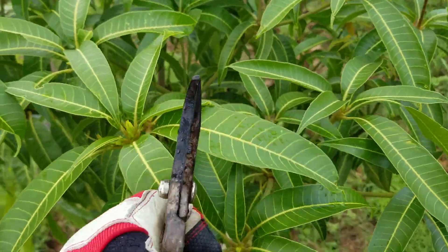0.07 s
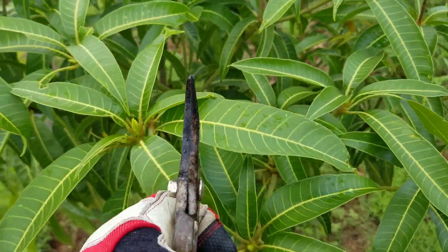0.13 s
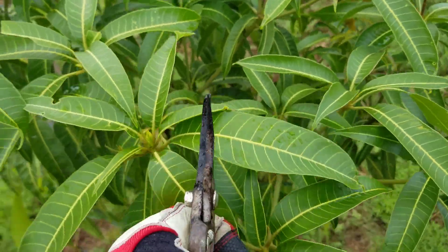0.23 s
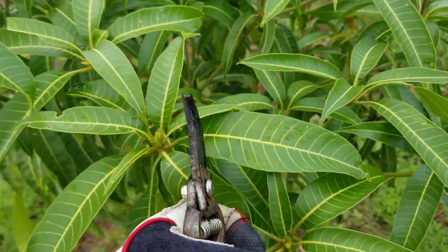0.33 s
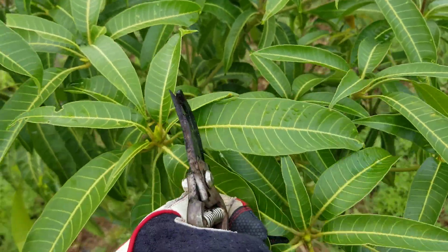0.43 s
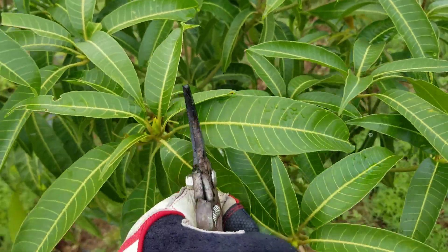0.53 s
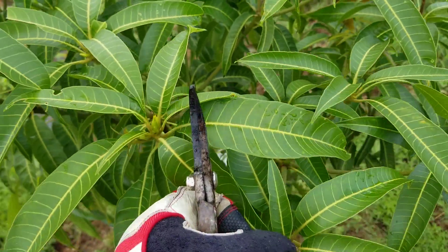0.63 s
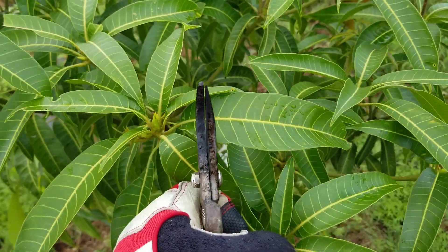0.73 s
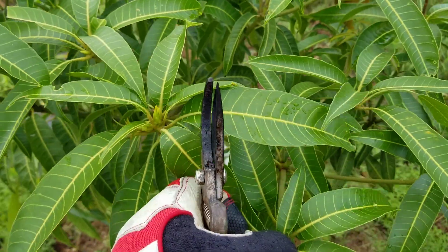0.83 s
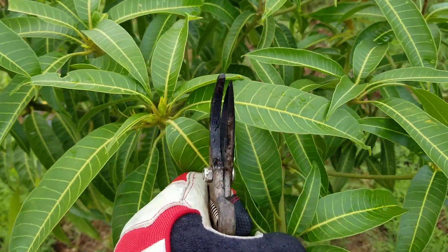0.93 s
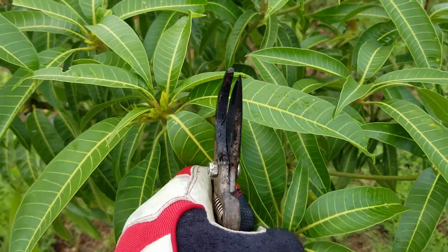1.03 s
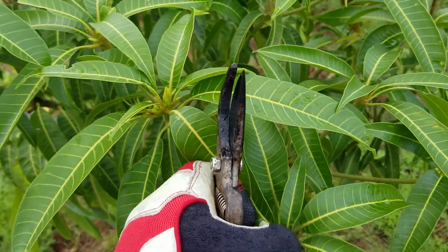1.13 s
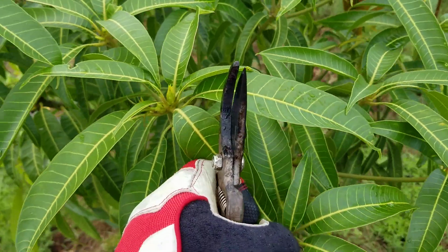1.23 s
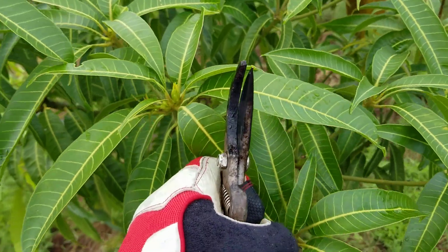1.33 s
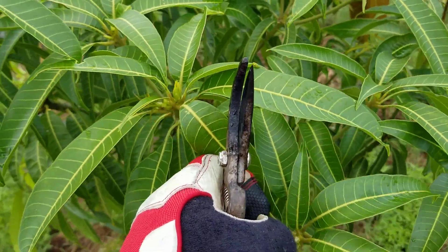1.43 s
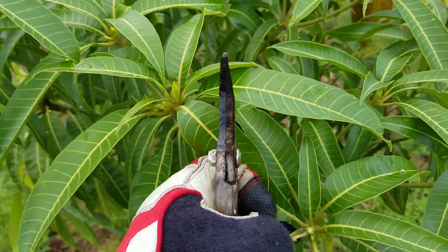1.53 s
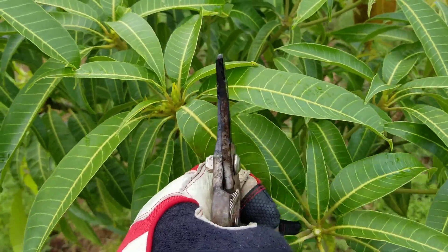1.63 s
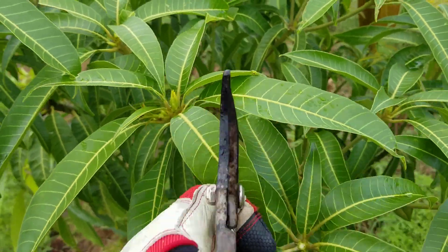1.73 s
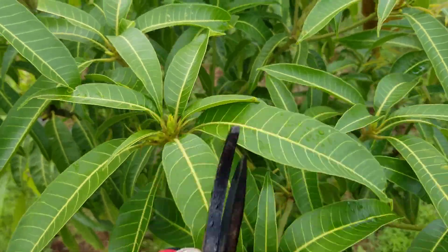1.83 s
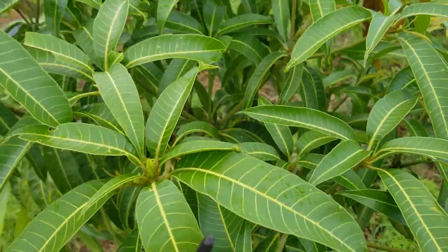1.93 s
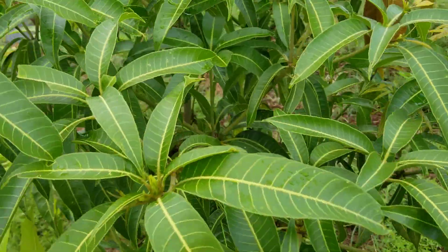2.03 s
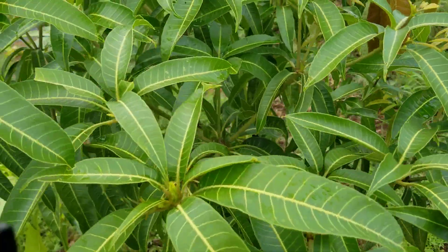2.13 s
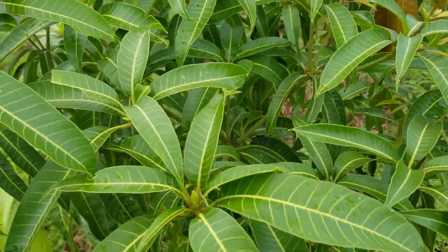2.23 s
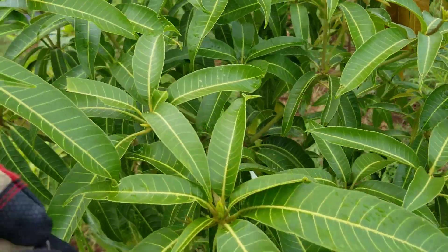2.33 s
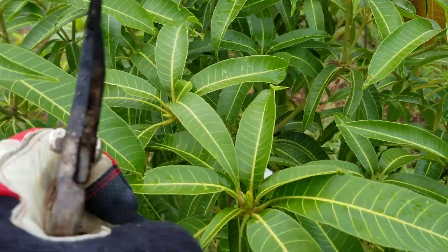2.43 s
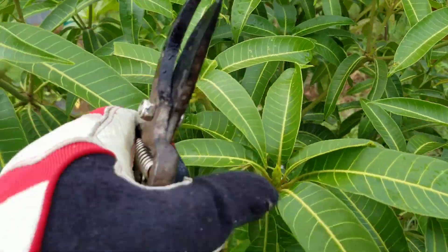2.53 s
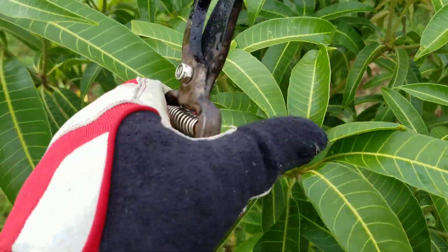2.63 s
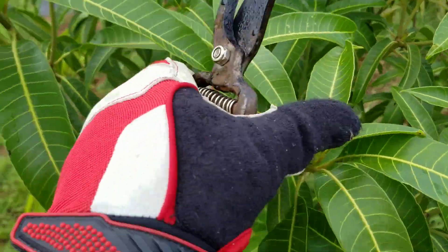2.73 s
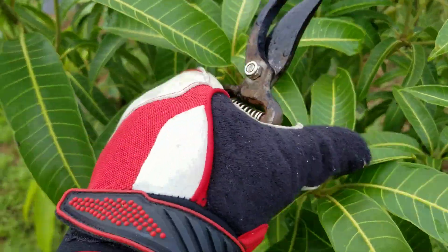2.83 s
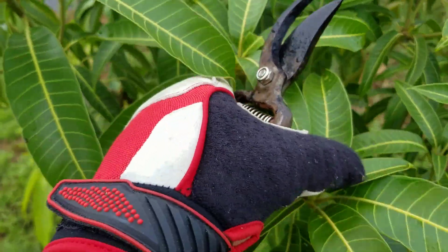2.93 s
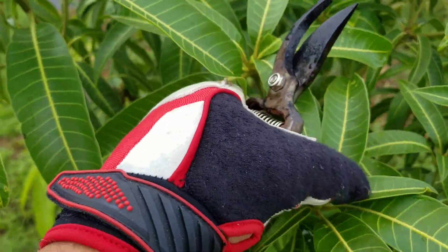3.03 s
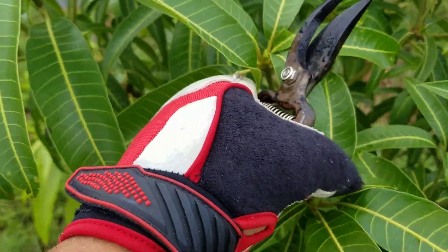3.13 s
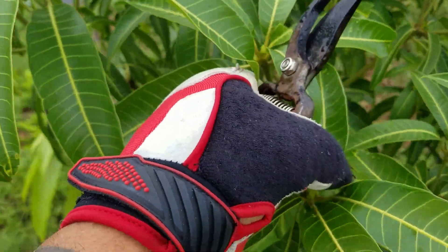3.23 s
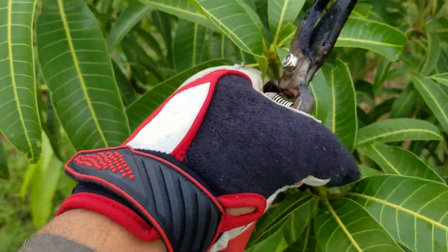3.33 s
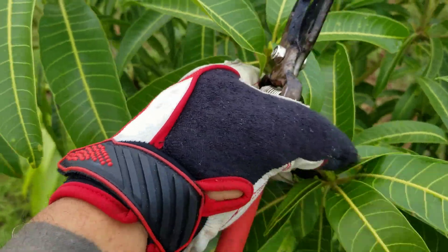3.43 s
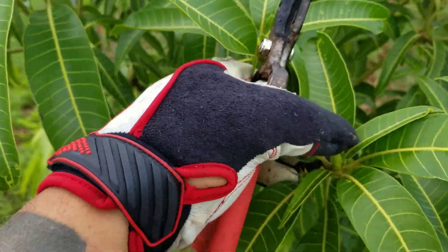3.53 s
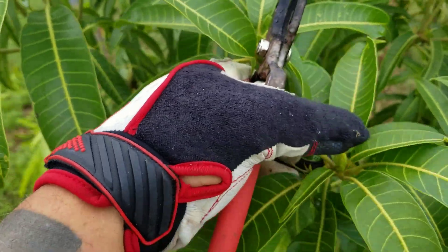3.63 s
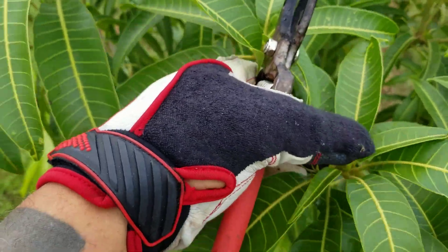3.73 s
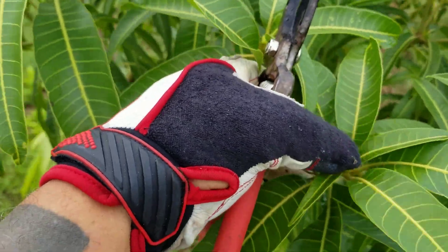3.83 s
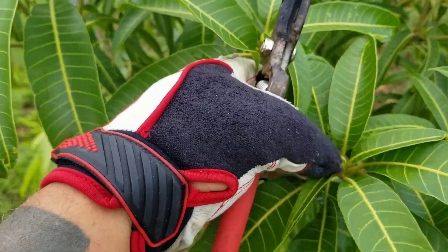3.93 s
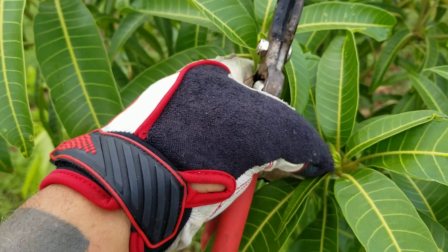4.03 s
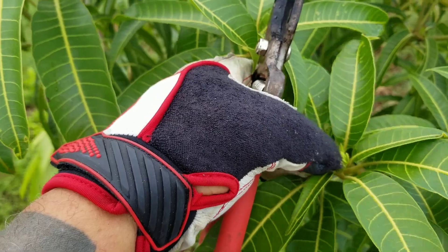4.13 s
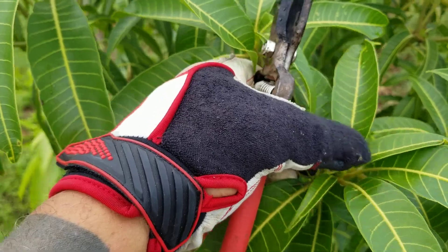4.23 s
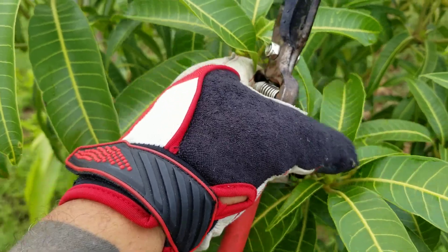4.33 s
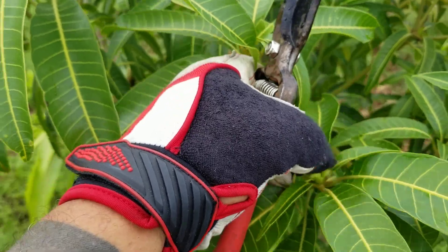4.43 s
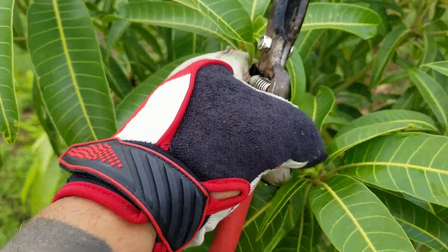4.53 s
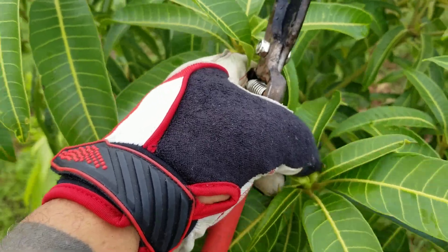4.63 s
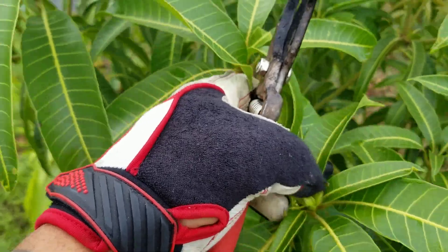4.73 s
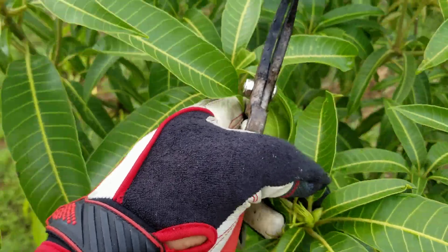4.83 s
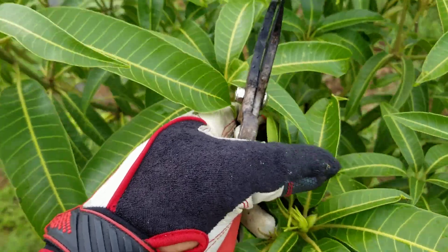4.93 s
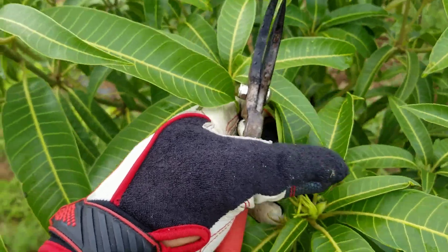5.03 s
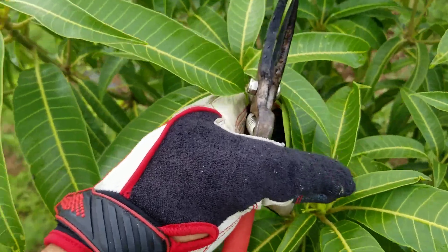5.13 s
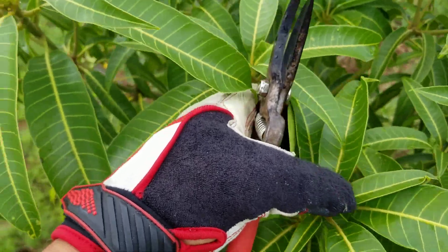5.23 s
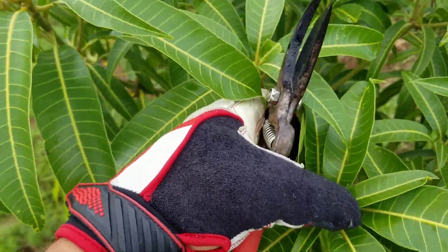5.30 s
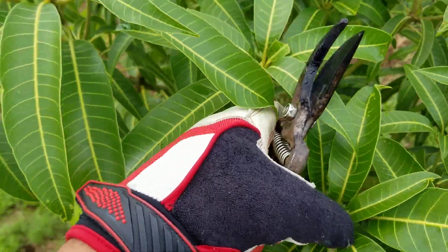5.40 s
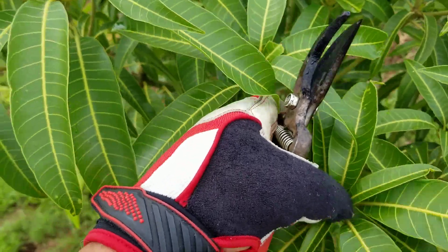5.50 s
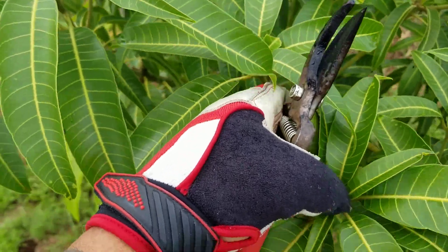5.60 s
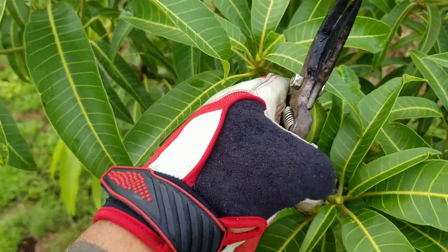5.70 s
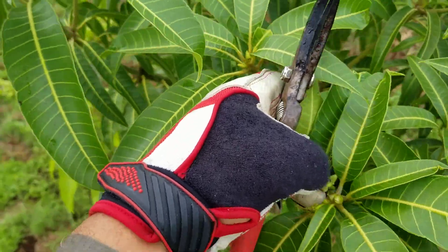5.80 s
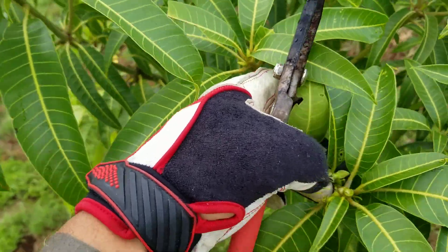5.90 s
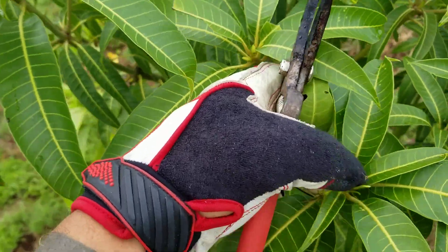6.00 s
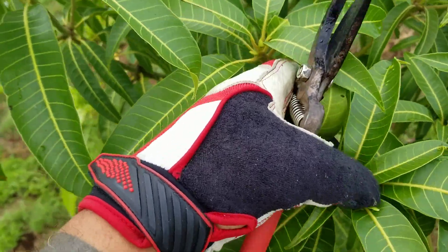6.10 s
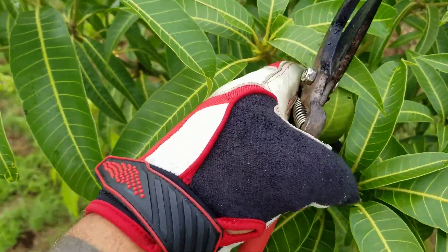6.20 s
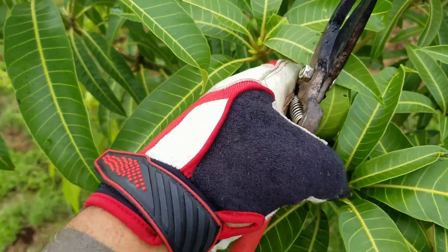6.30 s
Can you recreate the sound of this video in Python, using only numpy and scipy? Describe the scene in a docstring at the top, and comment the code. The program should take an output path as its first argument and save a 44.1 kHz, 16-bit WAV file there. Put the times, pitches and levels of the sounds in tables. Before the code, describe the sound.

Pruning shears click and snip among rustling leaves outdoors, with light wind on the microphone and roosters crowing faintly in the distance.

```python
"""A gloved hand works pruning shears among stiff leaves, close to a phone. From the start: snaps, knocks,
rustle, wind buffeting both microphone ports, a far hiss of trees and insects. Near 1 s a hen clucks
and a small bird chirps. Two distant roosters crow between 1.6 and 4.2 s; from 3.2 s a bird whoops.
The pivot squeaks at 4.56 s and a third rooster follows. The hardest snaps come at 5.6-5.7 s."""
import sys
import numpy as np
from scipy import signal
from scipy.fft import rfft, irfft, next_fast_len
from scipy.io import wavfile
from scipy.ndimage import uniform_filter1d, map_coordinates

SR = 44100
rng = np.random.default_rng(int(sys.argv[2]) if len(sys.argv) > 2 else 0)


def master(y):
    """Save y as 16-bit WAV."""
    cut = np.clip(np.atleast_2d(y).T, -1, 1)
    pcm = np.round(cut * 32767)  # scale
    wavfile.write(sys.argv[1], SR, pcm.astype(np.int16))


N = 280431

# Each row: start in seconds, level in dB, relative treble in dB, swell in ms.
SHEAR_SNAPS = [(0.064, -36, -4, 5.3), (.343, -30.5, 3, 1.3), (0.5382, -33, 19.5, 0.37),
               (0.895, -35.5, 7.5, 0.58), (1.209, -24.5, 0.5, 0.57), (1.2928, -38.5, 11, 0.41),
               (1.4751, -26, 1, 1.25), (1.8046, -35.5, 2, 0.93), (3.0755, -19, -9, 1.26),
               (3.091, -22.5, -9, 0.55), (3.299, -28, -2, 0.77), (3.472, -25.5, -1, 3.5),
               (3.6371, -28, -10, 0.95), (3.806, -25.5, -1.5, 4.7), (3.91, -39, 5, 6.1),
               (4.0026, -32.5, 2, 1.13), (4.043, -44, 12, 1.34), (4.123, -37, -3, 0.71),
               (4.4132, -25.5, 15, 0.24), (4.5017, -19, -2.5, 0.45), (4.558, -23.5, -6, .8),
               (4.595, -37, -4, 0.37), (4.6141, -25.5, 1, 0.59), (4.9126, -22.5, -0.5, 3.04),
               (5.512, -25, 6, 0.92), (5.5786, -6.5, 3, 0.39), (5.632, -24, 1, 1.26), (5.6642, -5, -4, 0.4),
               (5.678, -22, 0.5, 5.8), (5.7369, -5, 10.5, 0.32), (5.7595, -25, 0, 1.5),
               (6.18, -30.5, -5, 0.89), (6.346, -32, -2, 1.2)]
# Hand position. Each row: time in seconds, pan (left minus right) in dB.
HAND_PAN = [(0, -1.5), (5.58, -3), (5.7, -5.5)]
# Constant stirring of leaves. Each row: time in seconds, level in dB.
LEAF_STIR = [(0, -64), (.8, -65), (1.5, -62.5), (2.2, -67.5), (2.7, -56), (4.2, -58), (5.05, -62.5),
             (5.6, -54.5), (6.36, -63)]


def snaps():
    """A hard contact and a short crackle ring the shears' body and blade tips."""
    # Each row: mode frequency in Hz, width in Hz, gain in dB. The hand damps the body.
    body_modes = [(1040, 870, -6), (2480, 470, -0.5), (3100, 335, -1.5), (4430, 1640, -6)]
    tip_modes = [(7500, 920, 1.5), (11800, 2300, -0.5)]
    energy_db, tip_db = 7.5, -7.5
    out = np.zeros((2, N + SR))
    t_ms = 1000 * np.arange(1024) / SR
    hz = np.fft.rfftfreq(2048, 1 / SR)
    highpass = (1j * hz / (5000 + 1j * hz)) ** 2
    colour = np.array([resonances(body_modes, hz), resonances(tip_modes, hz) * highpass])[:, None]
    pan_db = curves(HAND_PAN)[0]
    for start_s, db, treble_db, swell_ms in SHEAR_SNAPS:
        at = round(start_s * SR)
        swell_ms = np.clip(swell_ms, .15, 5)
        age = t_ms / swell_ms * np.array([[[1]], [[1.4]]])  # axes: body/tips, channel, time
        envelope = age * np.exp(-age) + .2 * np.exp(-age / 5)
        noise = rng.standard_normal((2, 3, len(t_ms)))
        common = np.array([[[.85]], [[.3]]]) * noise[:, :1]
        crack = envelope * (common + 0.86 * noise[:, 1:])
        crack /= np.linalg.norm(crack, axis=2, keepdims=True)
        contact = round(swell_ms * SR / 1000)
        crack[:, [0, 1], [contact + 2, contact]] += 2.2 * np.exp(-swell_ms / .7)  # right port first
        crack = irfft(rfft(crack, 2048) * colour)[..., :1536]
        crack /= np.linalg.norm(crack, axis=2, keepdims=True)
        # The phone shades the tips more than the body.
        shade = amp(np.array([[.5], [-.5]]) * [[[1.1]], [[1.6]]] * pan_db[at])
        body, tips = crack * shade * np.sqrt(swell_ms)  # longer burst, more energy
        out[:, at:at + 1536] += amp(db + energy_db) * (body + amp(treble_db + tip_db) * tips)
    return out[:, :N]


def knocks():
    """Handle and stem bump softly: a few cycles of one mode, roughened by the grip."""
    # Each row: start in seconds, peak in dB, frequency in Hz.
    bumps = [(0.436, -29, 1040), (1.513, -31.5, 1170), (2.733, -29.5, 654), (2.81, -30.5, 1080),
             (2.817, -33, 1260), (2.826, -33, 1230), (2.838, -34.5, 1340), (2.858, -26.5, 1150),
             (4.132, -31.5, 336)]
    out, t = np.zeros(N + SR), np.arange(2048) / SR
    for start_s, db, hz in bumps:
        grip = 1 + 0.65 * unit(uniform_filter1d(rng.standard_normal(len(t)), size=16))
        envelope = amp(-60 * t * hz / 12) * (1 - np.exp(-t / 0.002))
        bump = envelope * grip * np.sin(2 * np.pi * hz * t)
        out[round(start_s * SR):][:len(t)] += amp(db) * bump / np.abs(bump).max()
    return placed(out[:N], pan_db=-2.5)


def squeak():
    """The pivot slips and catches: an uneven rising chirp, bright at first."""
    # Each row: time in seconds, slip rate in Hz, level in dB.
    slips = [(4.5582, 1450, -52), (4.5595, 1420, -33), (4.5625, 1730, -33), (4.563, 1520, -33),
             (4.571, 1815, -35.5), (4.577, 1740, -53)]
    hz, db = curves(slips)
    t = np.arange(N) / SR - slips[0][0]
    gate = (t > 0) * (t < slips[-1][0] - slips[0][0])
    phase = 2 * np.pi * np.cumsum(hz) / SR + .25 * wobble(900)
    harmonics = [amp(-14), amp(0.5), amp(6.5) * np.exp(-np.abs(t) / 0.0023), amp(-19.5)]
    wave = sum(gain * np.sin(k * phase) for k, gain in enumerate(harmonics, 1))
    grain = 1 + .2 * wobble(700)
    return placed(gate * np.sqrt(2) * amp(db) * grain * wave, pan_db=-7)


def rustle():
    """Leaves rub and the glove scuffs: patchy noise, lightly broken into puffs."""
    leaf_gain, glove_gain = handling()
    rub = (1.75 + crackle(110, spread_db=3.5, life_s=0.00092)) * stereo_noise(0.07)
    scuff = (2.0 + crackle(150, spread_db=9.0, life_s=0.0022)) * stereo_noise(0.89)
    # Each row: frequency in Hz, relative density in dB.
    leaf_spectrum = [(500, -23.5), (1000, 4), (1550, -3), (2200, 2), (3400, -4.5), (4400, -2.5),
                     (6000, -10.5), (10000, -13), (15850, -15)]
    glove_spectrum = [(120, -3), (400, -0.5), (850, -1), (1500, -6.5), (3000, -16), (6000, -42)]
    leaves = coloured(leaf_spectrum, patchy(rub, depth_db=3, bins=3, frames=12))
    glove = coloured(glove_spectrum, patchy(scuff, depth_db=3.5, bins=2, frames=6))
    side = amp(np.outer([.5, -.5], curves(HAND_PAN)[0]))
    return side * (leaf_gain * leaves + glove_gain * glove)


def handling():
    """Leaf and glove gains: the hand brushes through stirring leaves; each snap shakes them."""
    # Each row: centre in seconds, half length in seconds, leaf level in dB, glove level in dB.
    brushes = [(0.005, 0.059, -49.5, -55), (0.173, 0.021, -51.5, -80), (0.323, 0.085, -49.5, -55),
               (0.466, 0.095, -49, -59), (1.438, 0.03, -47, -88), (1.519, 0.053, -52.5, -61),
               (1.672, 0.049, -53, -64.5), (1.905, 0.038, -41.5, -48), (2.827, 0.029, -43.5, -49),
               (2.917, 0.13, -50, -55), (3.122, 0.053, -49, -56), (3.501, 0.088, -49, -61),
               (3.727, 0.018, -45, -63), (4.184, 0.072, -55, -51), (4.36, 0.031, -47, -50),
               (4.454, 0.13, -49.5, -55.5), (4.788, 0.16, -48, -57), (5.443, 0.21, -55, -62),
               (5.693, 0.071, -41, -48), (5.893, 0.057, -48, -72), (6.188, 0.057, -52, -63),
               (6.36, 0.014, -40, -48)]
    glove_db, shake_db, shake_s = -8.5, -26.5, 0.0068
    t = np.arange(N) / SR
    power = amp(curves(LEAF_STIR)[0] + [[0], [glove_db]]) ** 2
    for centre_s, half_s, *levels_db in brushes:
        power += amp(levels_db)[:, None] ** 2 / (1 + ((t - centre_s) / half_s) ** 2) ** 2.62
    for start_s, db, *_ in SHEAR_SNAPS:
        power[0] += amp(db + shake_db) ** 2 * (t > start_s) * np.exp(-2 * np.abs(t - start_s) / shake_s)
    return np.sqrt(power)


def ticks():
    """Leaf edges strike each other: sparse, tiny, bright clicks."""
    clicks = crackle(14, spread_db=4.5, life_s=0.00066) * stereo_noise(0.22)
    return amp(curves(LEAF_STIR)[0] - 12) * coloured([(2500, -30), (6000, 6), (16000, -6)], clicks)


def wind():
    """Breeze and puffs buffet the two ports: lumpy rumble, nearly unrelated left and right."""
    # Each row: time in seconds, level in dB, left minus right in dB.
    breeze = [(0, -48.5, 20), (.2, -65, -7), (.6, -47.5, 3.5), (.8, -64.5, -25), (1.2, -56, -19),
              (1.75, -55, -5), (2.1, -63, 6.5), (2.6, -57, 3), (3.2, -56.5, -11.5), (3.6, -51, 2.5),
              (4.5, -52.5, -4), (4.86, -65, -19), (5.05, -49.5, -1.5), (5.7, -55, 1.5), (6.36, -39, 15.5)]
    # Each row: start in seconds, length in seconds, top level in dB.
    puffs = [(0.345, 0.033, -40.5), (0.415, 0.069, -44.5), (0.491, 0.06, -36.5), (0.581, 0.057, -41),
             (1.495, 0.063, -38.5), (1.908, 0.029, -44), (2.343, 0.046, -47.5), (3.252, 0.2, -42.5),
             (3.778, 0.044, -43.5), (3.9, 0.077, -42.5), (4.928, 0.037, -42.5), (4.976, 0.11, -41),
             (5.176, 0.044, -40), (5.245, 0.013, -37.5), (5.304, 0.027, -39.5), (5.603, 0.14, -30),
             (5.937, 0.07, -42.5), (6.087, 0.084, -43), (6.207, 0.15, -46)]
    # Each row: frequency in Hz, relative density in dB.
    rumble_spectrum = [(20, -41), (38, -1.5), (56, 2.5), (100, -6.5), (200, -20.5), (450, -33.5)]
    edge_s = 0.0057
    t = np.arange(N) / SR
    breeze_db, pan_db = curves(breeze)
    power = amp(breeze_db) ** 2
    for start_s, length_s, db in puffs:
        progress = np.clip((t - start_s + edge_s) / (length_s + 2 * edge_s), 0, 1)
        power += (amp(db) * np.sin(np.pi * progress)) ** 2
    left_share = 1 / (1 + amp(-2 * pan_db))
    port_gain = 2 * np.sqrt(power * np.array([left_share, 1 - left_share]))
    lumps = amp(1.5 * np.array([wobble(20), wobble(13)]) + 1.5 * wobble(16))
    return port_gain * unit(lumps * coloured(rumble_spectrum, stereo_noise(0.086)))


def roosters():
    """Hoarse crows. Returns the low rooster, then the two high ones summed."""
    # One list per note. Each row: time in seconds, pitch in Hz, level in dB.
    low_notes = [
        [(2.33, 880, -64), (2.38, 870, -62), (2.4, 798, -52), (2.5, 810, -62)],
        [(2.668, 876, -45), (2.7, 900, -53), (2.76, 859, -49)],
        [(2.8, 896, -50), (3.08, 898, -57)],
        [(3.28, 832, -57), (3.36, 863, -50), (3.6, 883, -52.5), (4.19, 857, -54)],
    ]
    high_notes = [
        [(1.64, 1790, -66), (1.74, 1770, -61)],
        [(2.1, 1934, -69), (2.26, 1915, -70)],
        [(2.51, 1950, -63), (2.56, 2070, -53), (2.61, 1880, -56)],
        [(2.72, 1883, -55), (2.82, 1930, -55.5), (2.92, 2070, -59.5), (3.0, 1990, -52), (3.05, 1890, -55)],
        [(3.34, 1795, -57), (3.41, 1946, -48), (3.58, 1902, -46), (3.75, 1860, -57.5), (4.0, 1785, -55.5),
         (4.08, 1720, -73)],
    ]
    # The farthest rooster: one note, same columns.
    far_note = [(4.6, 2050, -64), (4.8, 2070, -62), (5.151, 2020, -63.5), (5.38, 1960, -69)]
    low = sum(voice(note, [-26], rough, waver=0.0056)
              for note, rough in zip(low_notes, [.5, .6, 1.2, .28]))
    high = sum(voice(note, [], rough) for note, rough in zip(high_notes, [.3, .65, .4, .7, .3]))
    return low, high + voice(far_note, [], rough=.8, waver=0.014)


def whoops():
    """A bird repeats one arched note; longer notes reach higher, up to a limit."""
    # Each row: start in seconds, length in seconds, level in dB.
    notes = [(3.214, 0.042, -57), (3.33, 0.061, -51.5), (3.462, 0.12, -55.5), (3.664, 0.11, -54.5),
             (3.889, 0.12, -54), (4.137, .13, -57), (4.374, 0.15, -57), (4.605, 0.096, -58),
             (5.086, 0.1, -63.5), (5.278, 0.12, -62), (5.844, 0.12, -65), (6.056, 0.16, -63),
             (6.264, 0.13, -61.5)]
    progress = np.linspace(0, 1, 9)
    arch = np.abs(np.sin(np.pi * progress)) ** 0.553
    out = np.zeros(N)
    for start_s, length_s, db in notes:
        hz = 870 + min(2200 * length_s, 259) * arch
        contour = np.transpose([start_s + progress * length_s, hz, np.full(9, db)])
        out += voice(contour, [-13], rough=.3)
    return out


def hen():
    """One call broken into short clucks."""
    # Each row: time in seconds, pitch in Hz, level in dB.
    call = [(.94, 1082, -61), (1.1, 1105, -62.5), (1.22, 1051, -64), (1.36, 1073, -59)]
    pulses = np.abs(np.sin(np.pi * 21 * np.arange(N) / SR + .5 * wobble(8.9)))
    return pulses * voice(call, [-10], rough=.7, waver=0.025)


def chirp():
    """A small bird: one faint, rough, high note."""
    # Each row: time in seconds, pitch in Hz, level in dB.
    note = [(1.04, 6900, -70), (1.09, 6960, -70)]
    return voice(note, [], rough=2)


def birds():
    """Calls from three directions, with echoes scattered by the trees."""
    low, high = roosters()
    others = whoops() + hen() + chirp()
    direct = placed(low, -0.5, 0.00013) + placed(high, -4.0, -0.000086) + placed(others, 0.43, -0.00011)
    t60_s = .3
    t = np.arange(SR // 2) / SR
    tail = rng.standard_normal((2, len(t))) * amp(-60 * t / t60_s)
    echoes = signal.fftconvolve((low + high + others)[None], tail / np.linalg.norm(tail[0]), axes=1)
    return direct + amp(-8) * echoes[:, :N]


def insects():
    """A steady, thin band of high noise."""
    # Each row: centre in Hz, half width in Hz, level in dB.
    bands = [(14200, 50, -79)]
    return sum(amp(db) * unit(filtered(stereo_noise(0), lambda f: np.exp(-((f - hz) / half_hz) ** 2)))
               for hz, half_hz, db in bands)


def trees():
    """Far hiss of trees, nearly steady."""
    # Each row: frequency in Hz, relative density in dB.
    hiss_spectrum = [(120, -68), (200, -5), (322, -17), (2040, -17), (6710, -8.5), (8990, -16.5),
                     (12700, -7.5), (15800, -12)]
    return amp(-66.5 + 0.56 * wobble(10.0)) * coloured(hiss_spectrum, stereo_noise(0.039))


def voice(contour, overtones_db, rough, waver=0.00366, edge_s=0.0056):
    """A call on a pitch contour; roughness shakes level and phase, smearing the line."""
    hz, db = curves(contour)
    t = np.arange(N) / SR
    gate = np.clip(np.minimum(t - contour[0][0], contour[-1][0] - t) / edge_s, 0, 1)
    phase = 2 * np.pi * np.cumsum(hz * (1 + waver * wobble(25))) / SR + rough * wobble(160)
    wave = np.sin(phase) + sum(gain * np.sin(k * phase) for k, gain in enumerate(amp(overtones_db), 2))
    return np.sqrt(2) * gate * amp(db) * (1 + .5 * rough * wobble(220)) * wave


def resonances(modes, hz):
    """Complex response of band-pass modes, alternating in sign."""
    return sum((-1) ** k * amp(db) * 1j * hz * width_hz / (mode_hz ** 2 - hz ** 2 + 1j * hz * width_hz)
               for k, (mode_hz, width_hz, db) in enumerate(modes))


def crackle(rate_hz, spread_db, life_s):
    """Envelope of random soft-edged puffs of unequal size, rms 1."""
    starts = (rng.random(N) < rate_hz / SR) * amp(spread_db * np.minimum(rng.exponential(size=N), 3))
    age = np.arange(2048) / SR / life_s
    return unit(np.abs(signal.fftconvolve(starts, age * np.exp(-age))[:N]))


def patchy(x, depth_db, bins, frames):
    """Random gain in time-frequency patches: resonances that come and go."""
    spectra = signal.stft(x, nperseg=256)[2]
    field = uniform_filter1d(rng.standard_normal(spectra.shape[1:]), bins, axis=0)
    field = uniform_filter1d(field, frames, axis=1)
    return signal.istft(spectra * amp(depth_db * unit(field)), nperseg=256)[1][:, :N]


def stereo_noise(coherence):
    """White noise, partly common to both channels."""
    common = np.sqrt(coherence) * rng.standard_normal(N)
    return common + np.sqrt(1 - coherence) * rng.standard_normal((2, N))


def coloured(spectrum, x):
    """x shaped by (Hz, dB) points on a log axis, rms 1."""
    hz, db = np.transpose(spectrum)
    response = lambda f: amp(np.interp(np.log(f + 1), np.log(hz), db, left=-120, right=-120))
    return unit(filtered(x, response))


def placed(x, pan_db, lead_s=0):
    """Stereo, left louder by pan_db and earlier by lead_s."""
    side = np.array([[.5], [-.5]])
    return amp(side * pan_db) * filtered(x, lambda hz: np.exp(2j * np.pi * hz * side * lead_s))


def filtered(x, response):
    """x through a complex frequency response."""
    size = next_fast_len(N + SR // 2)
    return irfft(rfft(x, size) * response(np.fft.rfftfreq(size, 1 / SR)), size)[..., :N]


def wobble(rate_hz):
    """Smooth curve through random knots."""
    knots = rng.standard_normal(int(N * rate_hz / SR) + 4)
    return map_coordinates(knots, [np.arange(N) * rate_hz / SR])


def curves(rows):
    """One value per sample for each column after the time."""
    times_s, *columns = np.transpose(rows)
    return [np.interp(np.arange(N) / SR, times_s, column) for column in columns]


def amp(db):
    """dB to gain."""
    return 10 ** (np.asarray(db) / 20)


def unit(x):
    """Scaled to rms 1."""
    return x / np.sqrt(np.mean(x ** 2) + 1e-20)


def scene():
    """All sources, in stereo."""
    return wind() + rustle() + snaps() + knocks() + ticks() + squeak() + birds() + insects() + trees()


def record(dry):
    """The phone keeps nothing above its band limit."""
    return filtered(dry, lambda hz: hz < 16400)


dry = scene()
out = record(dry)
master(out)
```